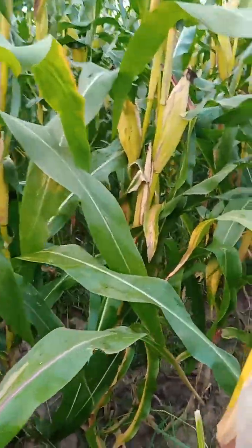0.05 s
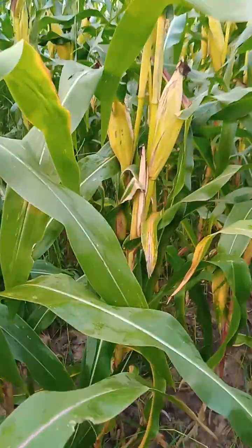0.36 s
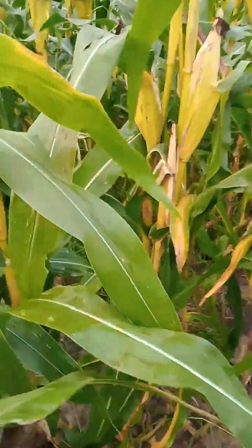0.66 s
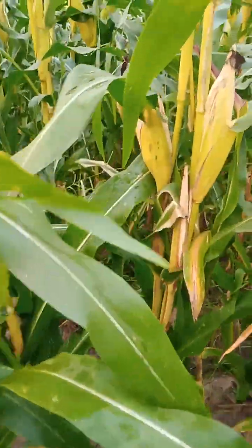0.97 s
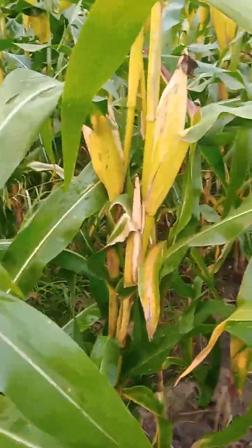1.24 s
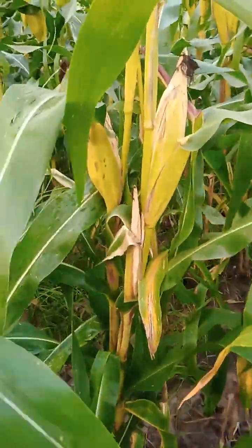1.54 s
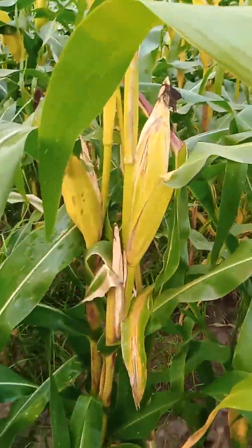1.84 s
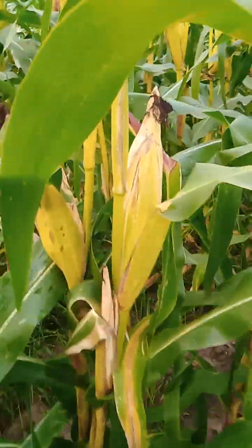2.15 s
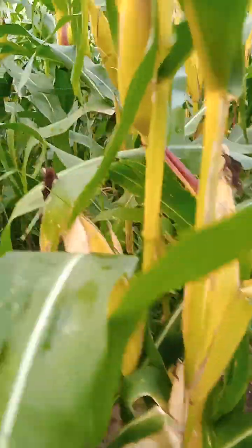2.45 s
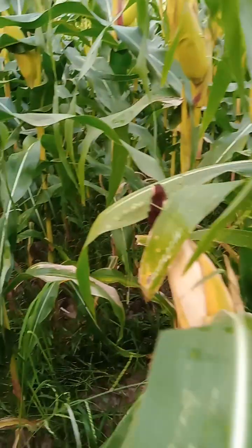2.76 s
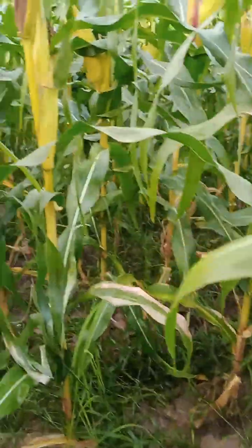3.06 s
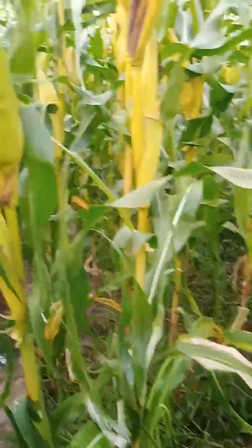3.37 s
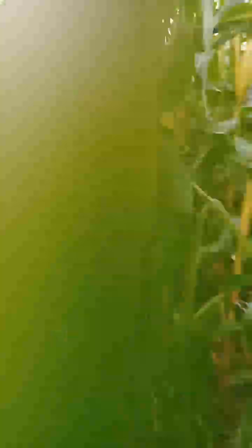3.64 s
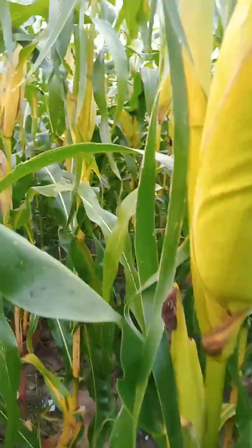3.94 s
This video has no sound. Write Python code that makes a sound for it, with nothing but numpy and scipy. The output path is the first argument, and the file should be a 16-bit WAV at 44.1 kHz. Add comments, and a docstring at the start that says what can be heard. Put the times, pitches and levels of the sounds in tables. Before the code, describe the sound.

Corn leaves rustle and crackle right at the microphone as someone moves slowly through a field. The rustling starts light and grows denser, with dry husks snapping, leaf edges rasping on stalks, and soft footfalls and shuffling legs underneath.

```python
"""Pushing through ripening corn

Someone moves slowly through a cornfield, one microphone close in among the plants. Leaves slide over
each other and over clothing in a dense run of tiny slips; dry blades and husks crackle and snap, and now
and then a leaf edge rasps along a stalk with a narrow ring. Underneath are the shuffle of legs, soft
footfalls and bumps on the stalks, and the faint hiss of plants farther off."""
import sys
import numpy as np
from scipy import signal
from scipy.fft import rfft, irfft
from scipy.io import wavfile
from scipy.ndimage import uniform_filter1d

SR = 44100
rng = np.random.default_rng(int(sys.argv[2]) if len(sys.argv) > 2 else 0)


def put_to_file(sound):
    """Save the sound as 16-bit audio at rate SR, in the file named by the first command-line argument."""
    columns = np.atleast_2d(sound).T  # one column per channel
    safe = np.clip(columns, -1, 1)
    whole_steps = np.round(safe * 32767)
    wavfile.write(sys.argv[1], SR, whole_steps.astype(np.int16))


N = 176400
TIME = np.arange(N) / SR

# hiss of the distant plants: (frequency [Hz], gain [dB])
FIELD_SPECTRUM = [(100, -18), (280, -2.5), (450, -18), (800, -23), (1250, -17), (2100, -15), (3000, -6),
                  (3700, 0), (7400, -5), (9300, -36), (15500, -16)]
# push of legs and clothing: (time [s], level before trim [dB])
SHUFFLE_LEVELS = [(0.0, -48), (0.09, -66), (0.18, -80), (0.26, -63), (0.35, -60), (0.46, -58), (0.6, -68),
                  (0.68, -53), (0.8, -48.5), (0.9, -47), (1.2, -45), (1.4, -56), (1.65, -50), (1.95, -48),
                  (2.07, -52.5), (2.3, -46.5), (2.4, -41.5), (2.55, -45), (2.7, -47.5), (2.82, -38.5),
                  (3.05, -44.5), (3.17, -41), (3.22, -45), (3.35, -56.5), (3.53, -45), (3.68, -50),
                  (3.82, -46), (4.0, -49)]
# tone of that rubbing: (frequency [Hz], gain [dB])
SHUFFLE_SPECTRUM = [(25, -35), (45, -14), (68, -7.5), (110, -0.5), (170, -1), (270, 1.5), (450, -4.5),
                    (700, -4), (1500, -28)]
# footfalls and bumps on stalks: (time [s], level [dB], decay [s])
THUD_EVENTS = [(0.459, -48.5, 0.01), (0.651, -38.5, 0.0066), (0.893, -32, 0.0049), (1.153, -37.5, 0.019),
               (1.264, -33, 0.0066), (2.36, -26.5, 0.0066), (2.741, -30, 0.0035), (2.784, -34, 0.0069),
               (2.823, -34, 0.0085), (3.177, -30, 0.0051)]
# dull tone of soil and stalks: (frequency [Hz], gain [dB])
THUD_SPECTRUM = [(30, -50), (48, -14), (75, -18), (120, -4.5), (260, -2), (450, -5), (1100, -16),
                 (2200, -34), (6000, -67)]
# leaf edges on stalks: (time [s], length [s], level [dB], ring [Hz], ring width [Hz])
RASP_EVENTS = [(0.116, 0.13, -48, 3870, 1400), (0.87, 0.039, -37, 3640, 700), (0.945, 0.16, -33, 3890, 700),
               (1.204, 0.087, -40.5, 5770, 900), (2.393, 0.23, -41, 1960, 900),
               (2.567, 0.15, -36, 4000, 800), (2.908, 0.164, -33, 4760, 1500),
               (3.106, 0.044, -31, 1310, 1110)]
# blades and husks breaking, plus one sharp knock at 2.359 s, band levels before trim and tone: (time [s], low
# [dB], middle [dB], treble [dB], top [dB], decay [s])
SNAP_EVENTS = [(.001, -52, -27, -45, -38, 0.0062), (0.0225, -57, -23, -46, -48, 0.0023),
               (.031, -56, -27, -37, -43, 0.0017), (.426, -48, -44, -33, -42, 0.0071),
               (0.6411, -32.5, -27.5, -25, -39, 0.0015), (0.822, -40, -37, -25.5, -37, 0.0017),
               (1.160, -32, -40, -26, -43, 0.00058), (1.3407, -57, -26, -29.5, -38, 0.0013),
               (1.5139, -35, -34, -37, -58, .0006), (1.6367, -32.5, -33.5, -47, -46, .0015),
               (1.6876, -38, -32, -49, -52, .0012), (1.7764, -45, -37, -31.5, -35, 0.0037),
               (1.8604, -42, -39, -31, -43, 0.0028), (1.917, -52, -44, -34, -32, 0.006),
               (1.9221, -41, -27.5, -27, -28, .0018), (1.9302, -45, -31.5, -25, -33, 0.0014),
               (1.9786, -43, -47, -32, -38, 0.0014), (1.9818, -30, -40, -38, -48, 0.0014),
               (2.359, -27, -28.5, -26, -34, 0.0046), (2.41, -47, -22.5, -42, -46, .0006),
               (2.427, -42, -25, -28, -41, .0016), (2.4631, -25.5, -28, -32, -51, 0.00061),
               (2.539, -47, -25, -41, -40, 0.001), (2.7066, -40, -31, -27, -45, 0.0016),
               (2.7428, -31, -28, -23.5, -34, 0.002), (2.7783, -30, -36, -31, -44, 0.00065),
               (2.7831, -33, -27, -19, -33, 0.0019), (2.8213, -36, -24.5, -19.5, -35, 0.0015),
               (2.8278, -35, -27.5, -20.5, -34, .002), (2.8365, -36, -31, -22.5, -43, 0.0012),
               (2.864, -42, -36, -22.5, -41, 0.0036), (2.873, -46, -24, -29, -42, .0012),
               (2.875, -37, -26, -25, -42, 0.0019), (2.911, -31, -35, -24, -40, .0012),
               (2.9166, -37, -40, -22.5, -46, .0005), (2.946, -35, -33, -21.5, -33, .0012),
               (3.051, -30.5, -35, -25, -40, .0006), (3.1014, -18, -25, -21, -28, 0.00076),
               (3.1072, -17, -28, -26, -34, 0.00073), (3.1707, -42, -25, -28, -32, 0.0013),
               (3.1763, -39, -27, -24.5, -33, 0.0012), (3.328, -46, -42, -29, -25.5, 0.0012),
               (3.4034, -34, -36, -27.5, -39, 0.0033), (3.4523, -30, -44, -22.5, -46, 0.001),
               (3.5098, -47, -30, -26.5, -47, 0.002), (3.5383, -62, -19, -32, -47, 0.0011),
               (3.7396, -44, -46, -23, -27, 0.0018), (3.795, -48, -31, -25, -35, 0.0022),
               (3.803, -50, -35, -23.5, -39, .003), (3.832, -43, -30, -36, -32, 0.0011)]
# the four bands of a snap: (lower edge [Hz], upper edge [Hz])
SNAP_BAND_EDGES = [(700, 1500), (1500, 3000), (3000, 6800), (13000, 15800)]
# colour the microphone lends every snap, dipping near 3 kHz and 9-11.5 kHz: (frequency [Hz], gain [dB])
SNAP_SPECTRUM = [(100, -2), (2400, -1), (2950, -7), (3700, -0.5), (7300, 0.5), (9000, -4.5),
                 (11500, -1), (13000, 0)]
# leaves sliding at the microphone, levels before trim: (time [s], middle [dB], treble [dB], top [dB])
LEAF_LEVELS = [(0.0, -41, -30.5, -42), (0.032, -46, -40.5, -44.0), (0.052, -49.5, -45, -61),
               (0.11, -51, -59, -61), (0.16, -52.5, -52, -57), (0.37, -51.5, -48.5, -58.5),
               (0.425, -47.5, -40.5, -50), (0.465, -37.5, -38, -45), (0.52, -48.5, -42.0, -54.5),
               (0.62, -45, -42.5, -51), (0.66, -40.5, -35, -48), (0.7, -45.5, -39, -52),
               (0.82, -41.5, -37.5, -48.5), (0.88, -39, -32, -43), (1.03, -33.5, -31.5, -44),
               (1.105, -38, -34.5, -45.5), (1.16, -31.5, -29, -38.5), (1.205, -34, -32, -42.5),
               (1.25, -35, -35, -44), (1.315, -37.5, -35.5, -50), (1.333, -41.5, -37, -49),
               (1.37, -44, -41.5, -54), (1.46, -45, -43.5, -56), (1.6, -40.5, -38.5, -46),
               (1.8, -40.5, -38.5, -45.5), (1.93, -40.5, -36, -47), (2.0, -40.5, -39.5, -49.5),
               (2.26, -38.5, -38, -47.5), (2.31, -36.5, -33, -38), (2.342, -43, -38, -47),
               (2.378, -30.5, -26, -39), (2.46, -35, -36, -44), (2.54, -32.5, -31, -45.0),
               (2.58, -32.5, -25.5, -37.5), (2.67, -30.5, -28, -36), (2.692, -36, -36, -46),
               (2.76, -36, -32.5, -42.5), (2.8, -32.5, -33.5, -45), (2.865, -33.5, -29.5, -40.5),
               (2.893, -37, -34.5, -46), (2.925, -32.5, -30, -41.5), (3.01, -31.5, -29, -36.5),
               (3.08, -33.5, -29.5, -38.5), (3.13, -31.5, -28.5, -36.5), (3.21, -33.5, -30, -40),
               (3.26, -34, -30, -43), (3.35, -37.5, -35, -45.5), (3.47, -37, -35, -46.0),
               (3.55, -36, -33.5, -45), (3.59, -35, -34.5, -47), (3.72, -34, -28.5, -38.5),
               (3.77, -34, -33, -44.0), (3.8, -35.5, -28, -36.5), (3.86, -35, -32, -43),
               (3.94, -35, -31, -36), (4.0, -35, -34.5, -48)]
# tone of the leaves before their three bands are levelled: (frequency [Hz], gain [dB])
LEAF_SPECTRUM = [(200, -26.5), (320, -8.5), (480, -10.5), (680, -9), (950, -3.5), (1300, -2), (1600, -1),
                 (1900, -1.5), (2350, 1.5), (2950, -5), (3750, 2.5), (4600, -1), (5800, -3.5), (7100, -4.5),
                 (8000, -11), (9300, -26.5), (10200, -25), (11400, -28), (12600, -17), (14200, -12),
                 (15400, -11)]

BASE_SLIPS_PER_S, SLIP_SPREAD_DB, SLIP_COLOUR_DB = 2500, 3, 3.5
SCATTER_DB, SCATTER_S = -8.5, 0.0012
SHUFFLE_TRIM_DB, SHUFFLE_FIRM_DB, SHUFFLE_BASS_HZ = -0.5, -45.5, 176
SNAP_TRIM_DB, SNAP_TAIL_DB, SNAP_TAIL_S, SNAP_RING_DB = -0.5, -21, 0.007, 4
MIDDLE_TRIM_DB, TREBLE_TRIM_DB, TOP_TRIM_DB = 0.14, -0.49, 2
CROWD_ABOVE_DB, THIN_BELOW_DB, LEAF_BODY_HZ, FRICTION_HISS_DB = -35, -46.5, 1130, -2


def from_db(db):
    """Decibels to gain."""
    return 10 ** (np.asarray(db) / 20)


def rms_one(x):
    """Scale to rms 1."""
    return x / np.sqrt(np.mean(x ** 2) + 1e-20)


def in_time(rows):
    """Join rows by straight lines, one curve per column."""
    times, *columns = np.transpose(rows)
    return [np.interp(TIME, times, column) for column in columns]


def drift(hz):
    """Smooth random wander of rms 1, mostly slower than hz."""
    hop, settle = 40, 2000
    pole = np.exp(-2 * np.pi * hz * hop / SR)
    noise = rng.standard_normal(N // hop + settle + 2)
    slow = signal.lfilter([1], [1, -2 * pole, pole * pole], noise)[settle:]
    return np.interp(np.arange(N) / hop, np.arange(len(slow)), rms_one(slow))


def band(x, low, high):
    """Gentle causal band-pass."""
    sos = signal.butter(2, [low, min(high, SR / 2 - 1)], "band", fs=SR, output="sos")
    return signal.sosfilt(sos, x)


def zone(x, low, high):
    """Keep only what lies between two frequencies."""
    hz = np.arange(N // 2 + 1) * SR / N
    return irfft(rfft(x) * ((hz >= low) & (hz < high)), N)


def coloured(x, spectrum):
    """Minimum-phase filter that follows rows of (frequency [Hz], gain [dB])."""
    hz, db = np.transpose(spectrum)
    n = len(x)
    grid = np.maximum(np.arange(n + 1) * SR / (2 * n), 1)
    gain = from_db(np.interp(np.log(grid), np.log(hz), db))
    cepstrum = irfft(np.log(gain))
    cepstrum[1:n] *= 2
    cepstrum[n + 1:] = 0
    return irfft(rfft(x, 2 * n) * np.exp(rfft(cepstrum)))[:n]


def evened(x, smooth_hz=700):
    """Level the spectrum of a short burst, so that it cracks as one."""
    step_hz = SR / len(x)
    power = uniform_filter1d(np.abs(rfft(x)) ** 2, int(smooth_hz / step_hz))[1:]
    hz = step_hz * np.arange(1, len(power) + 1)
    return coloured(x, np.transpose([hz, -10 * np.log10(power)]))


def add(out, at, sound):
    """Mix a sound in at a time in seconds."""
    start = max(int(at * SR), 0)
    out[start:start + len(sound)] += sound[:max(N - start, 0)]


def slips(crowding=1):
    """Random stick-slip clicks of steady mean power: many small, a few large."""
    sizes = from_db(SLIP_SPREAD_DB * np.minimum(rng.exponential(1, N), 5)) * rng.choice([-1, 1], N)
    slipping = rng.random(N) < crowding * BASE_SLIPS_PER_S / SR
    return sizes * slipping / np.sqrt(crowding)


def scattered(clicks):
    """Reflections off the plants round the microphone give each click a brief diffuse tail."""
    pole = np.exp(-2 / (SCATTER_S * SR))
    tail_power = signal.lfilter([1 - pole], [1, -pole], clicks ** 2 + 1e-18)
    return clicks + from_db(SCATTER_DB) * rng.standard_normal(N) * np.sqrt(tail_power)


def distant_field(level_db=-51.5):
    """Faint, even hiss of the plants farther from the microphone."""
    hiss = band(rng.standard_normal(N), 140, 13000)
    return from_db(level_db) * rms_one(coloured(hiss, FIELD_SPECTRUM))


def leg_shuffle():
    """Lumpy low rubbing of legs, clothing and bending leaves; a light touch has little bass."""
    level_db, = in_time(SHUFFLE_LEVELS)
    friction = rms_one(slips()) + rng.standard_normal(N)
    flutter = from_db(3 * drift(hz=30))
    rub = rms_one(coloured(friction * flutter, SHUFFLE_SPECTRUM))
    bass_gain = from_db(0.46 * np.minimum(level_db - SHUFFLE_FIRM_DB, 0))
    rub += (bass_gain - 1) * zone(rub, 0, SHUFFLE_BASS_HZ)
    return from_db(level_db + SHUFFLE_TRIM_DB) * rub


def thuds(rise_s=0.0003):
    """Footfalls on soil and bumps on stalks: dull pushes that die quickly."""
    out, t = np.zeros(N), TIME[:SR // 10]
    dull = coloured(rng.standard_normal(N), THUD_SPECTRUM)
    for at, db, decay in THUD_EVENTS:
        envelope = (1 - np.exp(-t / rise_s)) * np.exp(-t / decay)
        push = dull[int(at * SR):][:len(t)] * envelope
        power = np.sum(push ** 2) / (decay * SR)
        add(out, at, from_db(db) * push / np.sqrt(power))
    return out


def edge_rasps(fade_db=3):
    """A leaf edge drags along a stalk: a run of slips swells and fades in one resonance of the blade."""
    out, clicks = np.zeros(N), slips()
    for at, length, db, hz, width in RASP_EVENTS:
        ring = band(clicks, hz - width / 2, hz + width / 2)
        ring = ring[int(at * SR):][:int(length * SR)]
        swell = signal.windows.tukey(len(ring), 0.5)
        fade = from_db(np.linspace(0, -fade_db, len(ring)))
        add(out, at, from_db(db) * rms_one(ring * swell * fade))
    return out


def husk_snaps():
    """A dry blade or husk breaks close by: a broad crack, a burst of tearing fibres and a faint tail."""
    out, t = np.zeros(N), TIME[:SR // 20]
    onset = int(0.003 * SR)  # band levels are set over the first 3 ms
    for at, *levels_db, decay in SNAP_EVENTS:
        envelope = np.exp(-t / decay) + from_db(SNAP_TAIL_DB) * np.exp(-t / SNAP_TAIL_S)
        tear = rng.standard_normal(len(t)) * envelope
        tear[0] += 2.5  # the opening crack
        tear = evened(tear)
        ring_hz = rng.uniform(2200, 6500)  # every blade has a ring of its own
        tear += from_db(SNAP_RING_DB) * band(tear, 0.87 * ring_hz, 1.13 * ring_hz)
        for k, ((low, high), db) in enumerate(zip(SNAP_BAND_EDGES, levels_db)):
            part = (-1) ** k * band(tear, low, high)  # alternating signs join the bands without gaps
            add(out, at, from_db(db + SNAP_TRIM_DB) * part / np.std(part[:onset]))
    return coloured(out, SNAP_SPECTRUM)


def leaf_friction(crowding):
    """Each slip rings the blade with its own colour, over the hiss of finer friction."""
    out, clicks = np.zeros(N), slips(crowding)
    edges_hz = np.geomspace(300, 17000, 15)
    for low, high in zip(edges_hz, edges_hz[1:]):
        colour = from_db(SLIP_COLOUR_DB * np.clip(rng.standard_normal(N), -2, 2))
        grains = rms_one(scattered(clicks * colour * rng.choice([-1, 1], N)))
        flicker_db = 1.2 * drift(hz=30)
        wander_db = 0.93 * drift(hz=12)  # one leaf after another takes the lead
        hiss = from_db(FRICTION_HISS_DB) * rng.standard_normal(N)
        out += from_db(flicker_db + wander_db) * band(grains + hiss, low, high)
    return out


def sliding_leaves():
    """Leaves slide right at the microphone: a hard push crowds the slips, light contact sounds thin."""
    middle_db, treble_db, top_db = in_time(LEAF_LEVELS)
    crowding = from_db(0.99 * np.maximum(treble_db - CROWD_ABOVE_DB, 0))
    friction = leaf_friction(crowding)
    flutter = from_db(drift(hz=38))
    leaves = coloured(friction * flutter, LEAF_SPECTRUM)
    middle = rms_one(zone(leaves, 200, 2900))
    treble = rms_one(zone(leaves, 2900, 9500))
    top = rms_one(zone(leaves, 9500, 17000))
    body_gain = from_db(0.85 * np.minimum(middle_db - THIN_BELOW_DB, 0))
    middle += (body_gain - 1) * zone(middle, 0, LEAF_BODY_HZ)
    return (middle * from_db(middle_db + MIDDLE_TRIM_DB)
            + treble * from_db(treble_db + TREBLE_TRIM_DB)
            + top * from_db(top_db + TOP_TRIM_DB))


def scene():
    """Everything as heard at one microphone among the plants."""
    close_plants = sliding_leaves() + husk_snaps() + edge_rasps()
    return (close_plants + thuds() + leg_shuffle() + distant_field())[None]


def record(dry, low_cut_hz=46, high_cut_hz=15650):
    """The microphone drops the deepest bass, and the top is cut steeply."""
    low_cut = signal.butter(3, low_cut_hz, "high", fs=SR, output="sos")
    high_cut = signal.ellip(12, 0.1, 80, high_cut_hz, fs=SR, output="sos")
    return signal.sosfilt(high_cut, signal.sosfilt(low_cut, dry))


dry = scene()
out = record(dry)
put_to_file(out)
```